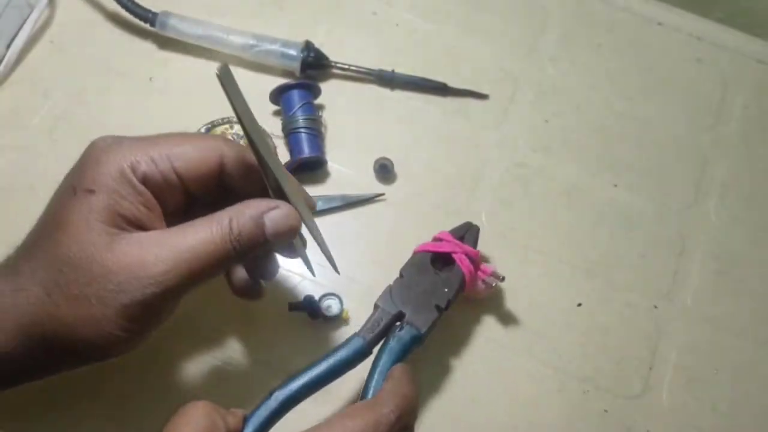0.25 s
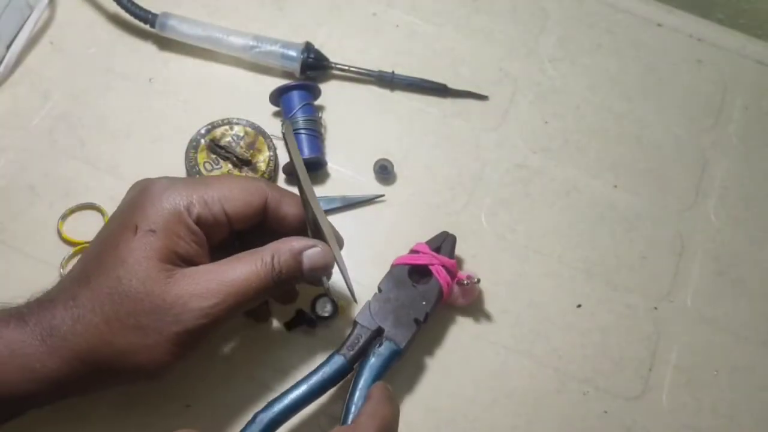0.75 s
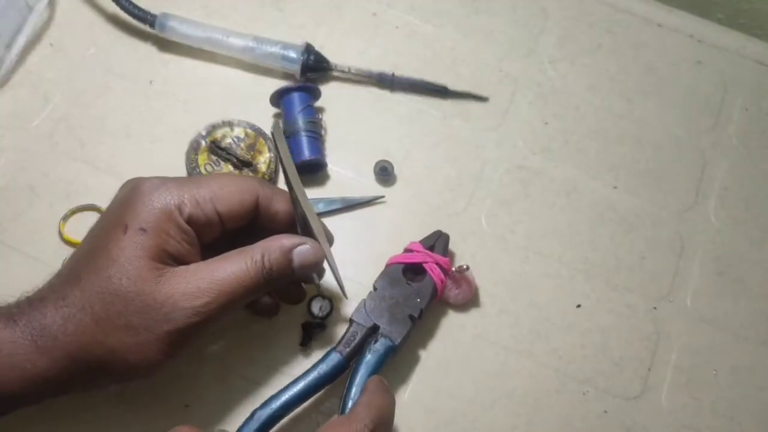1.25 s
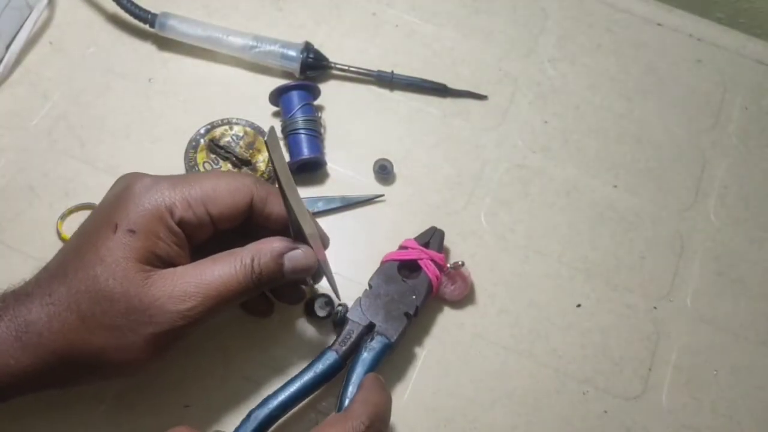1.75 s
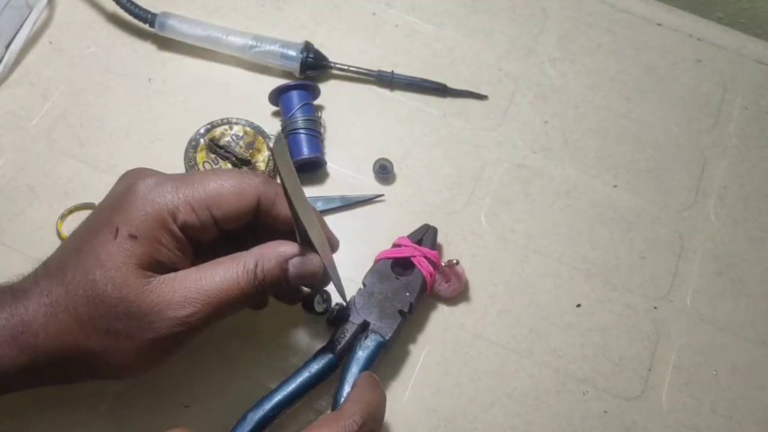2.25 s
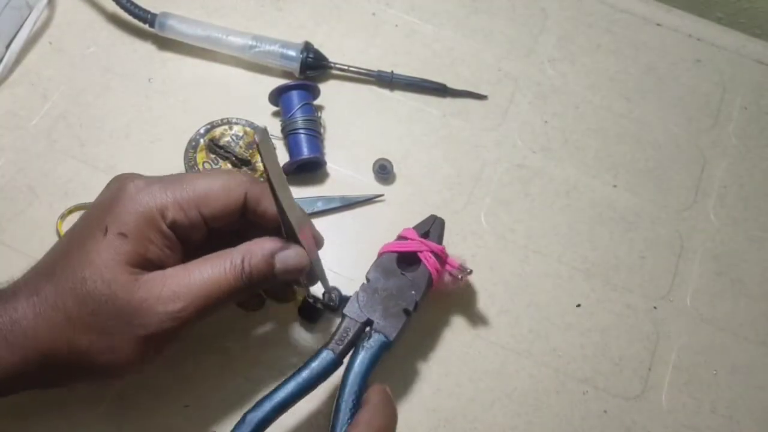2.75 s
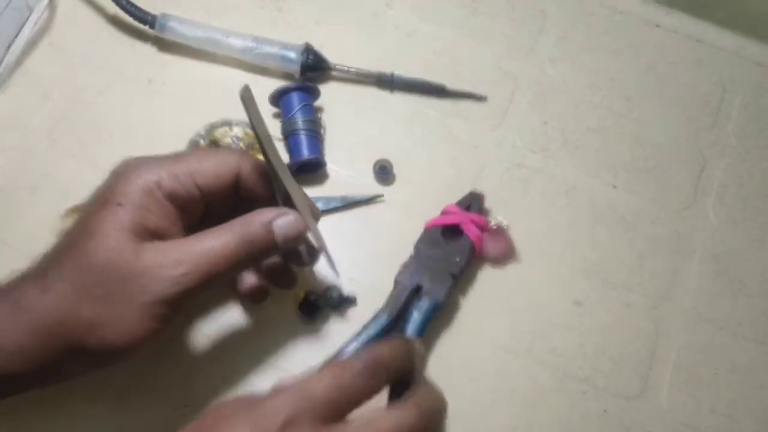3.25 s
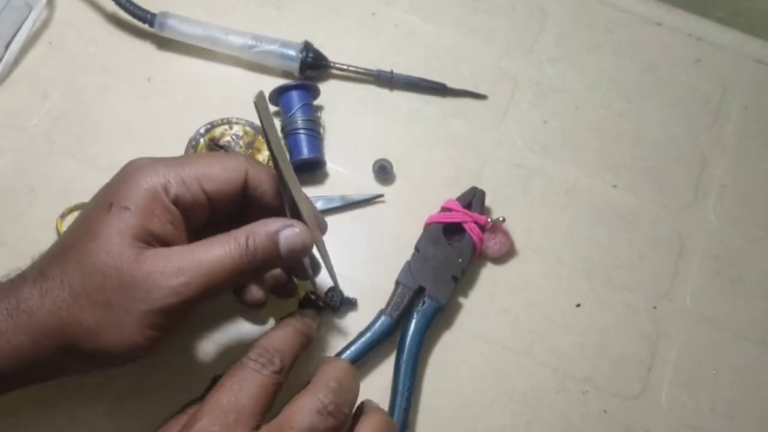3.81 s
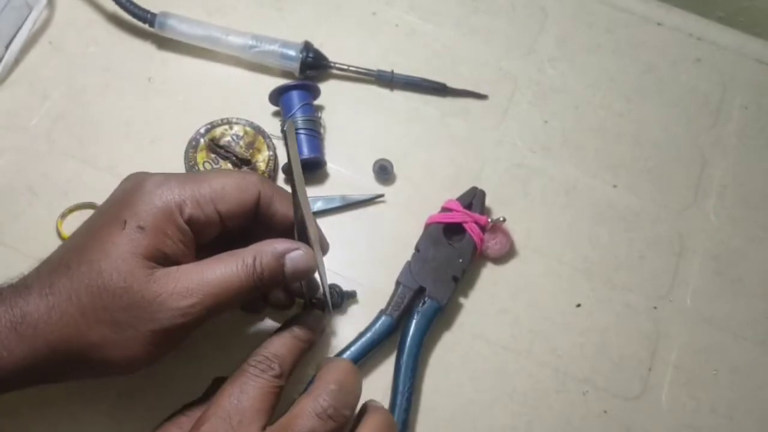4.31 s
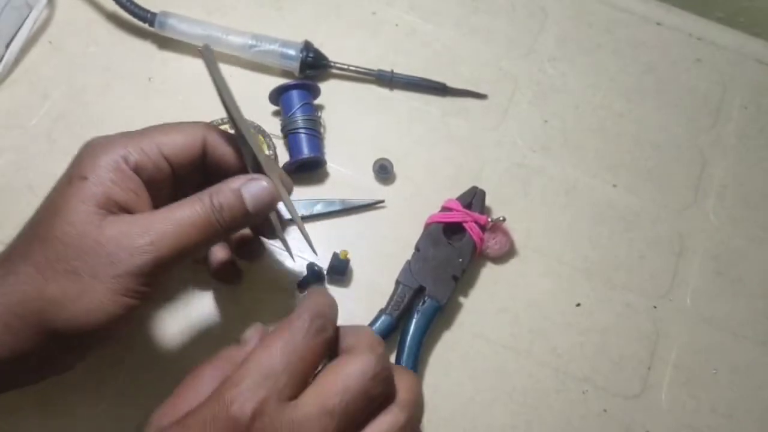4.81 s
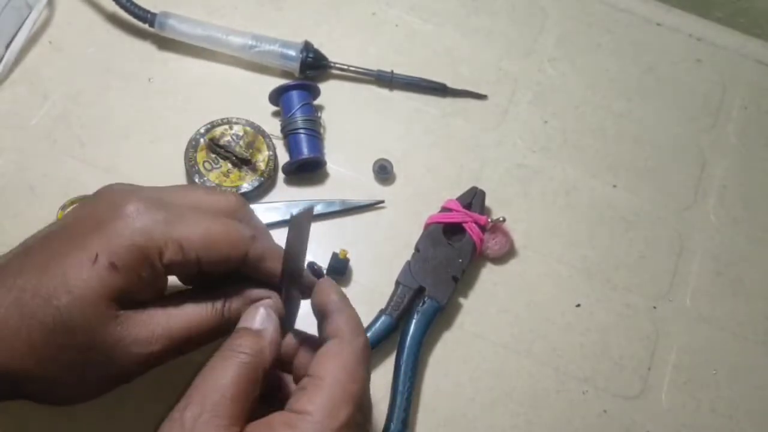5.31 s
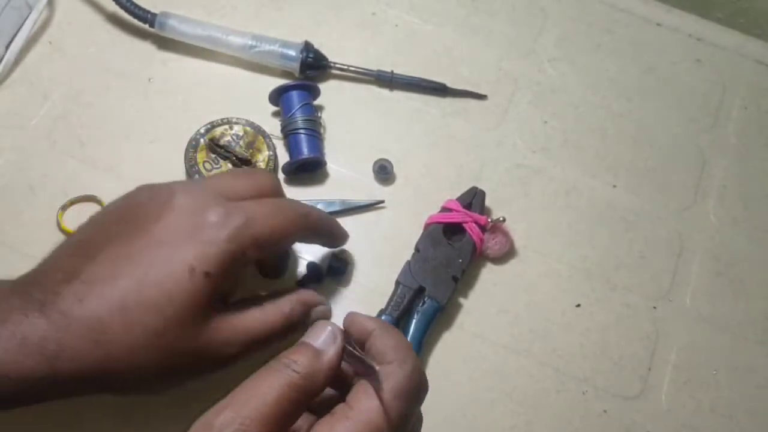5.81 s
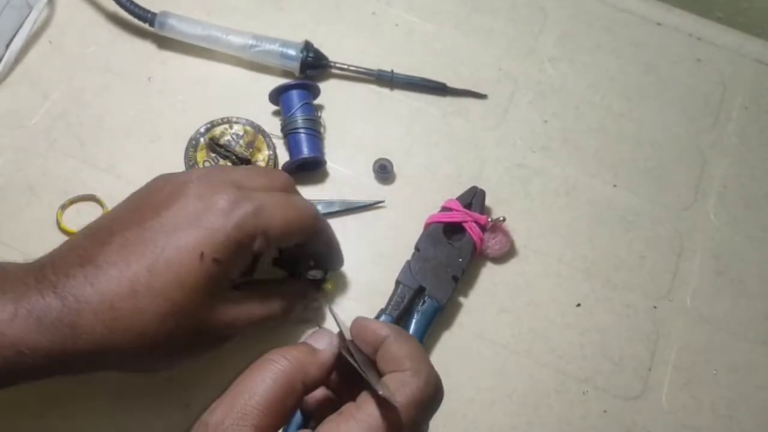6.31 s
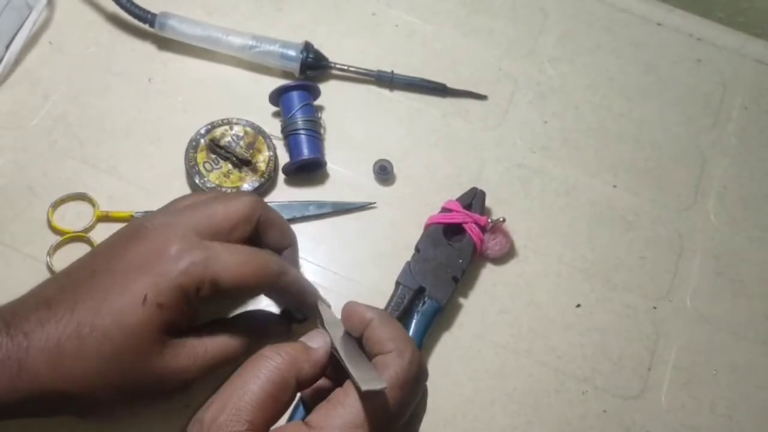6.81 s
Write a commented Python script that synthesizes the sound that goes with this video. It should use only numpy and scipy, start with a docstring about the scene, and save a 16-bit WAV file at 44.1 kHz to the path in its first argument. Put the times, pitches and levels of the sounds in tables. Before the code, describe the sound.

Steel tweezers click lightly on small plastic earbud shells while fingers rub over a workbench. About three seconds in, heavy pliers are laid down with a knocking clatter and a thin, very high ring. Clusters of lighter clicks and rubs follow to the end. The sounds are close and echo briefly in a small hard room, over a dull fan rumble and a steady electrical hum.

```python
"""Fingers and small plastic earbud shells rustle on a bench. Steel tweezers click on the shells and ring
twice near 1 s. Just after 3 s heavy pliers are laid down with a clatter, and their jaws ring as they settle.
Lighter clicks and rubs follow in clusters until about 7 s. Each touch shakes the bench top, the plastic
and the steel, and echoes in a small hard room. A dull fan rumble and a mains hum run below it all."""
import sys
import numpy as np
from scipy import signal
from scipy.io import wavfile
from scipy.ndimage import map_coordinates

SR = 44100
rng = np.random.default_rng(int(sys.argv[2]) if len(sys.argv) > 2 else 0)


def dump(signal):
    """Clip the signal to [-1, 1] and save it as 16-bit WAV at the path in sys.argv[1]."""
    limited = np.clip(np.atleast_2d(signal).T, -1, 1)
    pcm = np.round(limited * 32767).astype(np.int16)
    wavfile.write(sys.argv[1], SR, pcm)


N = 311346

# One row a touch: t/s, tool tip/dB, bench knock/dB, weight (boom over knock)/dB,
# sharpness (finest edge over tip)/dB, hardness (tilt of the knock)/dB per octave,
# extra shell rattle/dB, lean to the left/dB
CONTACTS = [(0.5712, -78, -99, 6, -32, 0, -6, -10), (0.78, -72, -85, 6, -29, 6, -18, 6),
            (0.8128, -67.5, -52, -10, -41, 1, -2, 2), (1.2494, -85.5, -92, 12, -31, -4, 7.5, 6),
            (1.2674, -78, -93, 16, -37, 1, -1, -9), (2.4906, -100, -62, -8, -30, 4, 5, -1),
            (2.5653, -66, -58.5, -18, -46, 4, 5.5, -3), (2.574, -68.5, -61.5, -4, -46, -4, 5.5, -2),
            (2.619, -88, -70, -15, -46, 0, 7, 0), (2.6579, -88, -65, -17, -40, 8, 11.5, 3),
            (2.7123, -79.5, -72, -10, -40, 0, 6, -8), (3.007, -57, -56, -8, -10.5, -5, -3, -4),
            (3.014, -56, -54, -1, -5, 2, -3, 9), (3.022, -55.5, -56, 18.5, -8, 6, -1, 3),
            (3.0332, -49, -39.5, -1.5, -10, -2.5, 1.5, -6), (3.2952, -66, -28.5, -7, -28.5, -4.5, -14, -2),
            (3.3005, -51, -42.5, -0.5, -26, 3, 5.5, -1.5), (3.3456, -45.5, -24, -10, -17.5, 6, -0.5, -1),
            (3.352, -64, -38.5, -3.5, -23, -6.5, 13.5, -5), (3.3635, -50, -39, -9, -22, -7, 2, 1),
            (3.4031, -57, -34, -23, -20, 0.5, -2.5, -1.5), (3.436, -81, -45.5, -15, -16, -2, -1, 8),
            (3.458, -79.5, -52, -2, -29, 2.5, -3, 1.5), (3.472, -84, -53, -15, -28, 2, -6, 5),
            (3.488, -80, -65, -12, -28, 4, -2, 3), (4.0833, -100, -60.5, -11, -14, 2.5, 7, -1),
            (4.106, -100, -60, -7.5, -23.5, -5, 0, 1), (4.4327, -89, -64.5, -2, -29, -8.5, 9, -3),
            (4.4495, -80.5, -56.5, -7, -32, -4.5, 9.5, -2), (4.4831, -65.5, -50, -14, -21, -8.5, 10.5, -3),
            (4.5176, -61.5, -53, -11, -38, -6.5, 3, -1.5), (4.538, -90, -55.5, -17, -35, -6, -6, -1.5),
            (4.5918, -45.5, -43.5, -15, -21.5, -0.5, -1.5, -1.5), (4.597, -61, -58.5, 0, -27, -5, 5, -5),
            (4.6227, -86, -58.5, -7, -28, 4, 0, -2), (4.632, -71.5, -54.5, -20, -33, 7, 0, -1.5),
            (5.7914, -89, -97, 18.5, -17.5, 10, -11, -8), (5.9108, -72, -66, -27, -50, 13, 1, 5.5),
            (5.918, -89, -60, -17.5, -32, 1, -6, -7), (5.934, -91, -61, -7, -35, 4, -7, -5),
            (5.9461, -100, -52, -4, -41, -1, -7, -1), (6.0437, -66.5, -59.5, -7.5, -37, 15.5, -2, -4.5),
            (6.0548, -67.5, -57, -9, -50, 16, 1.5, -0.5), (6.065, -73, -70, -20, -47, -12, 3, -2),
            (6.17, -87, -64.5, -22, -21, 15, -8, 1), (6.2334, -86, -63, -12, -20.5, 1.5, -11.5, -7),
            (6.3817, -75.5, -53.5, -1, -15, 1.5, 3.5, 1), (6.395, -76.5, -62, -3.5, -5, 12.5, 4.5, 4.5),
            (6.414, -71, -48.5, -1.5, -4, 0.5, -7.5, -0.5), (6.4195, -61, -49.5, -7, -5, -3, 6, 2.5),
            (6.451, -89, -57, -8, -8, 7, -4, -2), (6.511, -93, -58, -2, -17, -3, 3, 1),
            (6.7358, -102, -69, -4, -17, -11.5, -16, -5), (6.7908, -61, -41, -17, -45, -2.5, -1.5, -12),
            (6.886, -69, -61, -6, -7, -10.5, -5, 17), (6.8924, -51.5, -48.5, -2, -11.5, 0, -6, -9.5),
            (6.896, -53.5, -43, -3, -9.5, -5, 2, -1)]
# How alike the left and right sides sound: f/Hz, likeness (1 = the same)
LIKENESS = [(60, 0.65), (180, 1), (550, 0.43), (1650, 0.084), (4970, 0.0068), (15000, 0.012)]


def bench_knocks():
    """A blow gives the bench a brief push and sets it ringing with a deep boom, a low thud and a knock."""
    # The bench's tones, grouped by range, and those of the push: f/Hz, level/dB, fade time/s
    boom_tones = [(98, -11.5, .06), (127, 0, 0.09), (144, -1.5, 0.24), (182.8, 4.5, 0.065),
                  (204, 1.5, 0.058), (293, -3.5, 0.039)]
    thud_tones = [(392, -3.5, 0.012), (470, -1, 0.042), (532, 1.5, 0.018), (580, 2.5, 0.027)]
    knock_tones = [(816, -3.5, 0.015), (912, -0.5, 0.013), (1016, 5, 0.014), (1240, 1.5, 0.013),
                   (1380, -8.5, 0.0037), (1540, -6.5, 0.012)]
    push_tones = [(280, 4, 0.0078), (696, -3.5, 0.0029), (1064, -2.5, 0.0011), (1740, -2.5, 0.0053)]
    _, _, knock_db, weight_db, _, hardness, _, _ = np.transpose(CONTACTS)
    thud_db = knock_db - 4 + 0.068 * weight_db
    boom = struck(boom_tones, knock_db + weight_db, 0, chatter=0.3, width=0.12, order=3)
    thud = struck(thud_tones, thud_db, hardness, chatter=0.34, width=0.71, order=2)
    knock = struck(knock_tones, knock_db, hardness, chatter=0.39, width=0.94, order=2)
    push = struck(push_tones, knock_db + 5.5, hardness, chatter=0.075, width=0.25, order=1)
    return from_right(boom + thud + knock + push, lag_samples=5)


def shell_clacks():
    """The plastic shell clacks when the tool tips or the bench shake it."""
    # Tones of the shell: f/Hz, level/dB, fade time/s
    shell_tones = [(1900, -4, .004), (2150, 0, .006), (2550, -7, .003), (3050, -1, .006), (3600, -5, .003),
                   (4200, -4, .003)]
    _, tip_db, knock_db, _, _, _, rattle_db, _ = np.transpose(CONTACTS)
    shaking = from_db(tip_db + 7.5) + from_db(knock_db - 21.5)
    clacks = struck(shell_tones, rattle_db + 20 * np.log10(shaking), 0, chatter=0.87, width=1.0, order=4)
    return from_right(clacks, lag_samples=6)


def tool_ticks():
    """Steel tips tick as they touch; a sharper touch sounds brighter."""
    # Tones of the tips and of their finest edge: f/Hz, level/dB, fade time/s
    tip_tones = [(4860, 0.5, 0.002), (5320, 7, 0.0031), (6270, 13.5, 0.0035), (6573, 12, 0.004),
                 (7440, -4, 0.002)]
    edge_tones = [(8620, 9.5, 0.0039), (9930, 11, 0.0056), (11270, 11.5, 0.0044), (12300, 11, 0.0027),
                  (14200, 7.5, .004), (15300, 11.5, .004)]
    _, tip_db, _, _, sharp_db, _, _, _ = np.transpose(CONTACTS)
    tilt = 0.8 * (sharp_db + 10.5)
    tips = struck(tip_tones, tip_db, 0, chatter=0.48, width=1.0, order=7)
    edge = struck(edge_tones, tip_db + sharp_db, tilt, chatter=1.3, width=0.5, order=4,
                  pivot_hz=edge_tones[1][0])
    return from_right(tips + edge, lag_samples=6)


def tweezer_pings():
    """The free blades of the tweezers ring on after two of the touches."""
    # Taps that set the blades ringing: t/s, level/dB
    taps = [(0.814, -65), (1.268, -86)]
    # Tones of the blades: f/Hz, level/dB, fade time/s
    blade_tones = [(5620, -4, .1), (6600, 0, 0.28), (6680, -6, .2)]
    clicks = np.zeros(N)
    for s, level_db in taps:
        clicks[int(s * SR)] = from_db(level_db)
    rings = sum(from_db(db) * ring(clicks, hz, fade_s) for hz, db, fade_s in blade_tones)
    return keep_band(rings, 4500, 9000, order=4)


def plier_jaws():
    """The jaws of the pliers sing one very high note as they settle."""
    click = from_db(-51) * (np.arange(N) == int(3.372 * SR))
    return ring(click, hz=15250, fade_s=0.11)


def room_echoes(sound):
    """Hard walls send back dense echoes: noise that dies away band by band."""
    # Echo bands: f/Hz, fade time/s, relative level/dB
    echo_bands = [(145.7, 0.27, -12.5), (376, 0.19, -11.5), (1010, 0.4, -17), (2810, 0.32, -10.5),
                  (6150, 0.33, -14), (9600, 0.17, -20), (13700, 0.27, -17.5)]
    t = np.arange(SR // 2) / SR
    echoes = 0
    for hz, fade_s, level_db in echo_bands:
        noise = keep_band(rng.standard_normal((2, len(t))), hz / 1.415, min(hz * 1.65, .45 * SR))
        echoes = echoes + from_db(level_db - 60 * t / fade_s) * left_right(noise, hz)
    fade_in = np.clip(t / 0.00027, 0, 1)
    echoed = signal.fftconvolve(sound.mean(0)[None], echoes * fade_in * from_db(-19), axes=1)
    wobble_s = 0.00008   # a slight random wobble in timing smooths the echoes so no one pitch rings out
    return np.array([map_coordinates(side, [np.arange(N) + wobble_s * SR * drift(60)], order=3)
                     for side in echoed])


def rustle():
    """Fingers and shells rub the bench, and a wash of noise lingers after the pliers land: dull noise and
    bright hiss swell, flicker a little and fade."""
    # Rubs on the bench, and the two rows near 3.2 s and 3.5 s, which are the wash of noise that lingers after
    # the pliers land: loudest t/s, length/s, level/dB, brightness (0 to 1)
    rubs = [(0.0, 0.67, -76, 0.78), (0.605, 0.32, -71.5, 0.76), (0.829, 0.18, -59, 0.25),
            (1.268, 0.11, -71, 0.35), (1.425, 0.75, -73, 0.95), (1.83, 1, -88, 0.07),
            (2.606, 0.32, -60.5, 0.42), (3.163, 0.53, -56, 0.46), (3.51, 0.33, -61, 0.43),
            (4.089, 0.33, -75, 0.1), (4.548, 0.52, -61.5, 0.33), (4.908, 0.78, -87.5, 0.26),
            (5.324, 0.91, -80.5, 0.4), (5.596, 0.18, -83, 0.33), (5.926, 0.21, -64, 0.49),
            (6.083, 0.4, -63.5, 0.4), (6.23, 0.36, -78.5, 1), (6.577, 0.26, -62, 0.33),
            (6.888, 0.057, -47, 0.44)]
    # Tone colour of the dull and of the bright rubbing: f/Hz, relative level/dB
    dull_spectrum = [(600, -28.5), (1300, 1), (1690, 1), (2920, -1.5), (4150, -14.5), (5110, -10.5),
                     (6730, -13.5), (11000, -26.5), (14300, -69), (22000, -120)]
    bright_spectrum = [(880, -36), (1500, -8), (1960, -21.5), (3980, -29), (4900, -8), (6670, -1),
                       (8930, -20.5), (11000, -41.5), (14300, -59), (22000, -120)]
    rise_share, ends_db = 0.34, -26.5   # part of the length spent swelling; level at both ends
    t, dull_gain, bright_gain = np.arange(N) / SR, 0, 0
    for s, length, level_db, brightness in rubs:
        from_peak = np.maximum((s - t) / rise_share, (t - s) / (1 - rise_share)) / length
        gain = from_db(level_db + ends_db * from_peak)
        dull_gain += (1 - brightness) * gain
        bright_gain += brightness * gain
    dull = banded_noise(dull_spectrum, flicker_db=3, flicker_rate=6, edge_count=36)
    bright = banded_noise(bright_spectrum, flicker_db=1.5, flicker_rate=8, edge_count=24)
    grit = from_db(3.5 * drift(90))
    return keep_below(dull_gain * grit * dull + bright_gain * bright, hz=7600, order=12)


def faint_hisses():
    """Narrow bands of hiss swell and fade, a little rough."""
    # Hisses: start t/s, length/s, f/Hz, level/dB
    hisses = [(1.8, 0.15, 6100, -86.5), (4.03, 0.31, 5240, -88), (4.039, 0.3, 9900, -93),
              (3.967, .13, 3340, -90), (4.846, 0.16, 3480, -89), (4.196, 0.18, 2850, -82),
              (4.83, .18, 2900, -76), (5.173, 0.33, 4940, -87), (5.248, 0.15, 3370, -79.5),
              (5.295, 0.23, 2700, -84.5), (5.476, 0.19, 2980, -80.5), (5.66, 0.13, 3810, -91),
              (1.58, 0.38, 8400, -96), (1.65, 0.4, 5100, -93)]
    half_width = 0.024   # as a share of the pitch
    out = np.zeros((2, N))
    for s, length, hz, level_db in hisses:
        start, size = int(s * SR), int(length * SR)
        white = rng.standard_normal((2, SR // 2))
        noise = keep_band(white, hz * (1 - half_width), hz * (1 + half_width))[:, :size]
        out[:, start:start + size] += from_db(level_db) * rms_one(noise) * np.sqrt(np.hanning(size))
    return from_db(2.5 * drift(28)) * out


def fan():
    """A fan makes a dull rumble that slowly rises and falls a little."""
    # Tone colour of the rumble: f/Hz, relative level/dB
    fan_spectrum = [(18, -56), (30, -24), (69, -16.5), (81, -12), (102, -10.5), (123, -10.5), (160, -13),
                    (188, -13.5), (213, -23), (243, -11.5), (560, -23.5), (627, -24), (1080, -28.5),
                    (1400, -45.5), (1820, -81.5), (3080, -120)]
    # Its loudness over time: t/s, level/dB
    fan_levels = [(0.0, -57), (0.53, -59.5), (0.9, -56.5), (4.6, -56.5), (5.4, -58.5), (6.78, -56.5),
                  (7.06, -59)]
    rumble = banded_noise(fan_spectrum, flicker_db=1, flicker_rate=14, edge_count=22)
    level_db = np.interp(np.arange(N) / SR, *np.transpose(fan_levels))
    return from_db(level_db) * keep_below(rumble, hz=1205, order=7)


def mains_hum():
    """Magnetic hum at twice the mains frequency, with two overtones, wavering a little."""
    # Tones of the hum: f/Hz, level/dB
    hum_tones = [(100, -55.5), (200, -74), (300, -72.5)]
    t, out = np.arange(N) / SR, 0
    for hz, level_db in hum_tones:
        height = np.sqrt(2) * from_db(level_db + 0.33 * drift(40))
        out += height * np.sin(2 * np.pi * hz * t + 0.11 * drift(6.3))
    return out * from_db([[-.3], [.3]])   # slightly louder on the right


def struck(tones, level_db, tilt, chatter, width, order, pivot_hz=900):
    """Each contact rings the tones with a first touch and a quick chatter of 11 more."""
    # chatter: strength of the later touches; width: how much left and right differ
    s, lean_db = np.array(CONTACTS)[:, [0, -1]].T
    chatter_s = 0.007
    later = rng.random((len(s), 12)) * (np.arange(12) > 0)   # 0 = first touch, 1 = end of the chatter
    at = ((s[:, None] + later * chatter_s) * SR).astype(int)
    bounces = rng.standard_normal(at.shape)
    bounces = chatter * bounces / bounces.std(1, keepdims=True)
    strength = from_db(level_db[:, None] - 4.2 * later) * np.where(later > 0, bounces, -1)
    out = np.zeros((2, N))
    for hz, tone_db, fade_s in tones:
        tilt_db = np.reshape(tilt * np.log2(hz / pivot_hz), (-1, 1))
        share = strength * from_db(tone_db + tilt_db + 2.5 * rng.standard_normal(at.shape))
        clicks = np.zeros((2, N))
        for side, sign in enumerate((.5, -.5)):
            # chattering parts send their sound unevenly to the two sides
            uneven = 1 + width * (later > 0) * rng.standard_normal(at.shape)
            side_gain = from_db(sign * width * np.clip(lean_db, -6, 6))
            np.add.at(clicks[side], at, share * uneven * side_gain[:, None])
        out += ring(clicks, hz, fade_s)
    return keep_band(out, tones[0][0] * .7, tones[-1][0] * 1.12, order)


def ring(clicks, hz, fade_s):
    """Each click starts a pure tone that drops 60 dB in the fade time."""
    decay, step = from_db(-60 / (fade_s * SR)), 2 * np.pi * hz / SR
    return signal.lfilter([0, np.sin(step)], [1, -2 * decay * np.cos(step), decay ** 2], clicks + 1e-18)


def banded_noise(spectrum, flicker_db, flicker_rate, edge_count):
    """Stereo noise made of narrow bands, each flickering on its own."""
    out, edges = 0, np.geomspace(spectrum[0][0], spectrum[-1][0], edge_count)
    white = rng.standard_normal((2, 2, N))
    for k, (low, high) in enumerate(zip(edges, edges[1:])):
        hz = np.sqrt(low * high)
        gain = from_db(at_hz(spectrum, hz) + flicker_db * drift(flicker_rate))
        out = out + gain * left_right(keep_band(white[k % 2], low, high), hz)
    return rms_one(out)


def left_right(noises, hz):
    """Mixes two noises into a left and a right side, more alike in the bass."""
    common, difference = noises
    alike = at_hz(LIKENESS, hz)
    return np.sqrt(1 + alike) * common + np.sqrt(1 - alike) * difference * [[1], [-1]]


def from_right(sound, lag_samples):
    """The work lies to the right, so the left side hears it later."""
    return np.array([np.roll(sound[0], lag_samples), sound[1]])


def drift(rate):
    """A smooth random wobble of about +-1; a higher rate moves faster."""
    r = np.exp(-80 * np.pi * rate / SR)
    slow = signal.lfilter([1], [1, -2 * r, r * r], rng.standard_normal(N // 40 + 2002))[2000:]
    return np.interp(np.arange(N) / 40, np.arange(len(slow)), rms_one(slow))


def keep_band(x, low_hz, high_hz, order=2):
    """Keeps a range of pitches; a higher order cuts more steeply."""
    return signal.sosfilt(signal.butter(order, [low_hz, high_hz], "band", fs=SR, output="sos"), x)


def keep_below(x, hz, order):
    """Cuts the treble above hz."""
    return signal.sosfilt(signal.butter(order, hz, fs=SR, output="sos"), x)


def at_hz(points, hz):
    """Reads a table's value at a pitch between its rows."""
    pitches, values = np.transpose(points)
    return np.interp(np.log(hz), np.log(pitches), values)


def from_db(db):
    """Turns decibels into a multiplier."""
    return 10 ** (np.asarray(db) / 20)


def rms_one(x):
    """Scales a sound to an average power of 1."""
    return x / np.sqrt(np.mean(x ** 2) + 1e-20)


def scene():
    """Touches and their echoes over the rubbing, the fan and the hum."""
    hits = bench_knocks() + shell_clacks() + tool_ticks() + tweezer_pings()
    return hits + plier_jaws() + room_echoes(hits) + rustle() + faint_hisses() + fan() + mains_hum()


def record(dry):
    """Adds a faint, slightly dull hiss and cuts the highest treble."""
    hiss = signal.lfilter([1], [1, -0.8], rng.standard_normal(dry.shape))
    treble_cut = signal.cheby2(16, 70, 16300, fs=SR, output="sos")
    return signal.sosfilt(treble_cut, dry + from_db(-94.5) * hiss)


dry = scene()
out = record(dry)
dump(out)
```